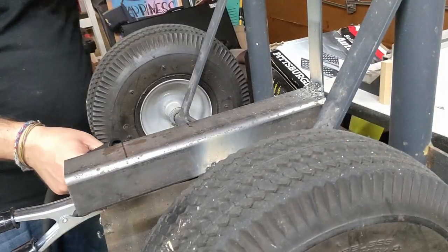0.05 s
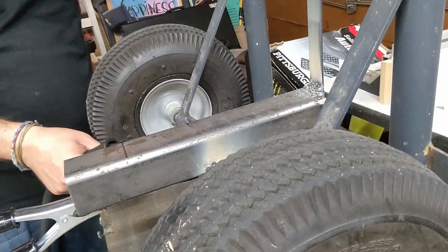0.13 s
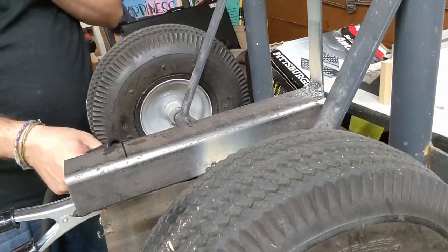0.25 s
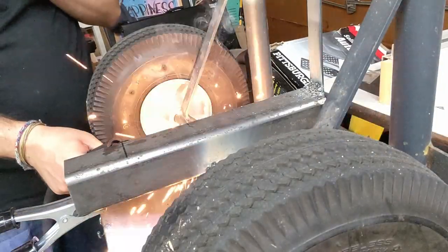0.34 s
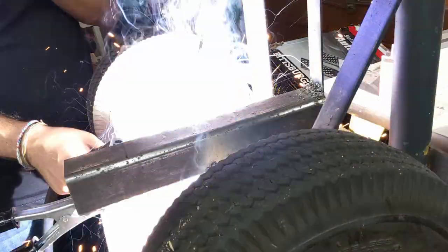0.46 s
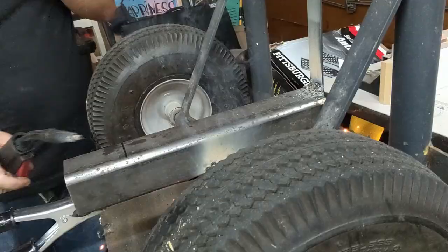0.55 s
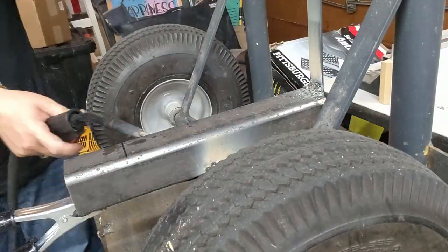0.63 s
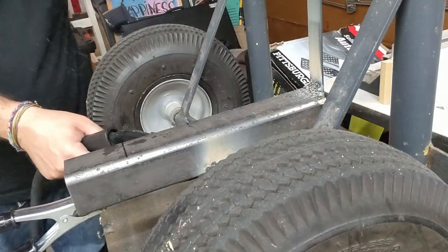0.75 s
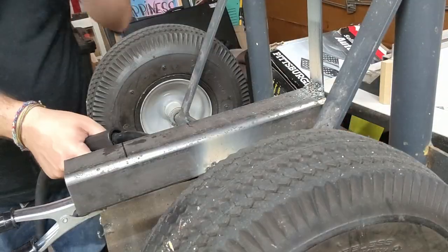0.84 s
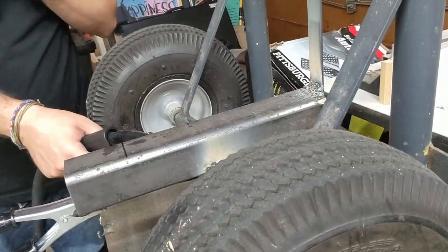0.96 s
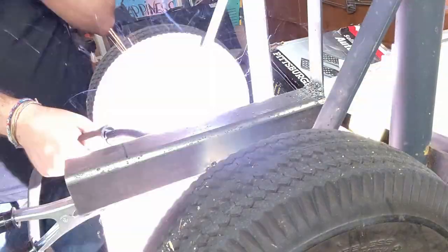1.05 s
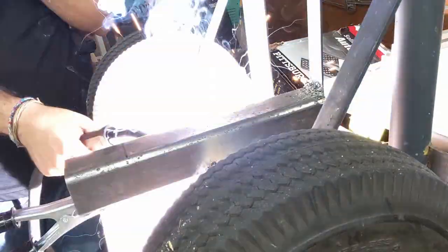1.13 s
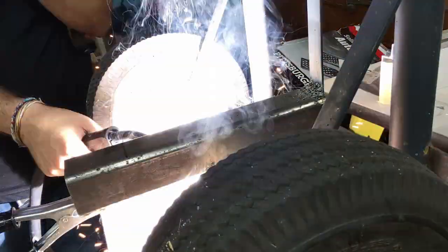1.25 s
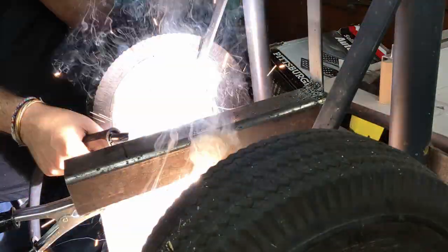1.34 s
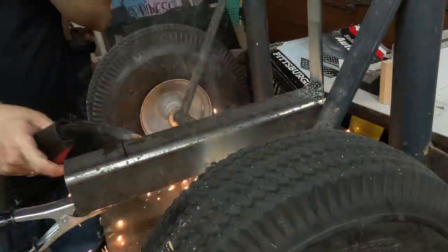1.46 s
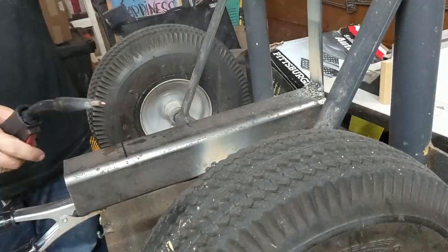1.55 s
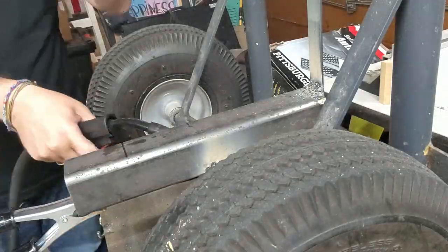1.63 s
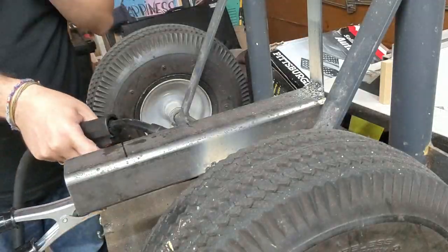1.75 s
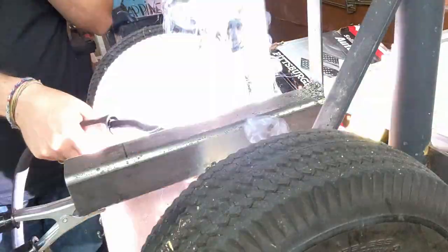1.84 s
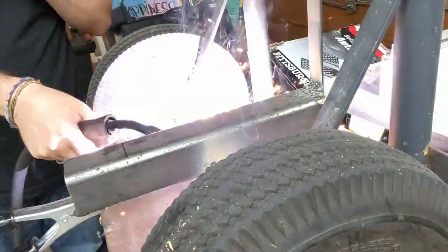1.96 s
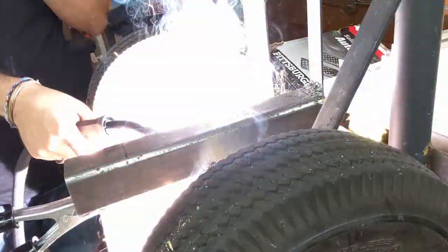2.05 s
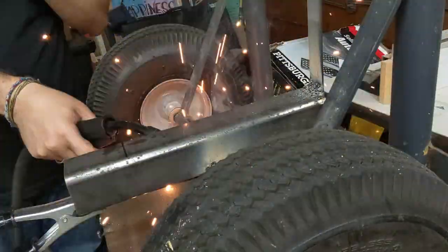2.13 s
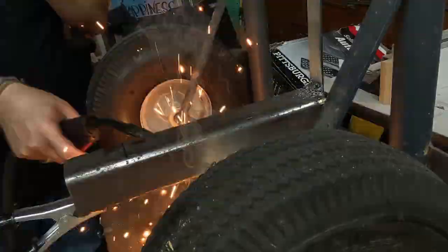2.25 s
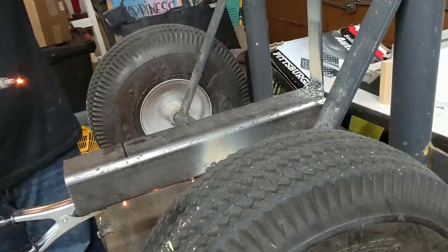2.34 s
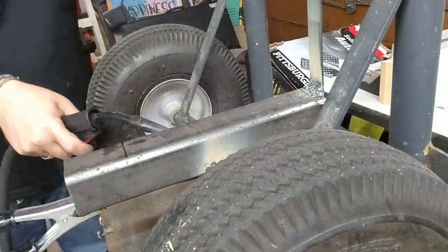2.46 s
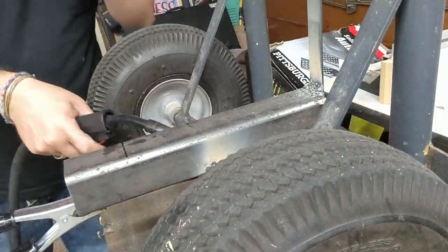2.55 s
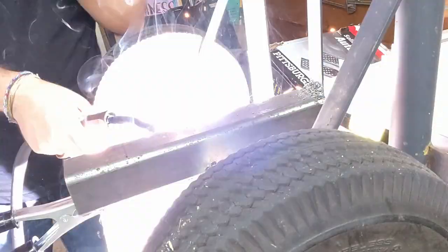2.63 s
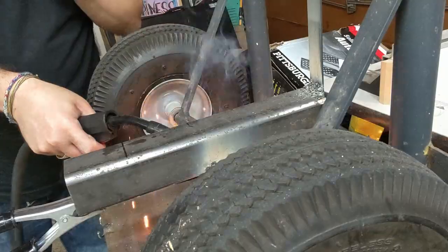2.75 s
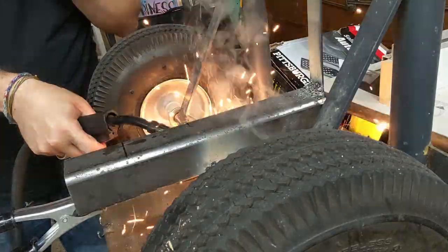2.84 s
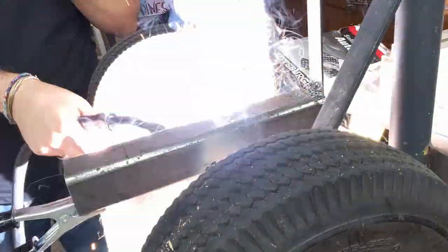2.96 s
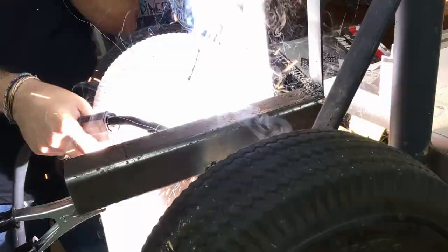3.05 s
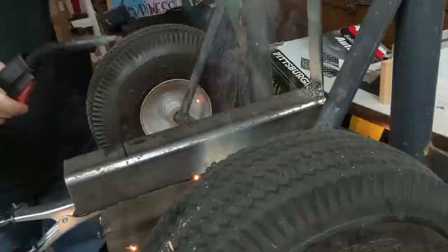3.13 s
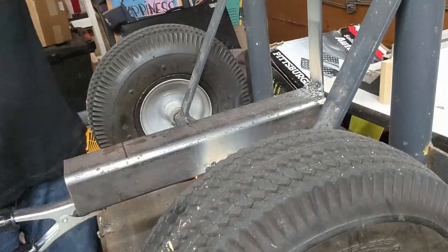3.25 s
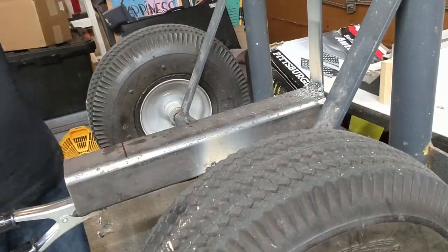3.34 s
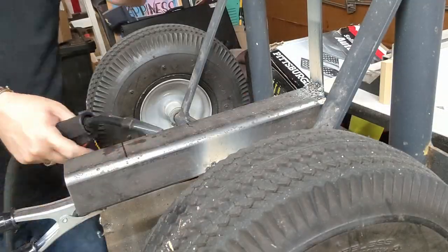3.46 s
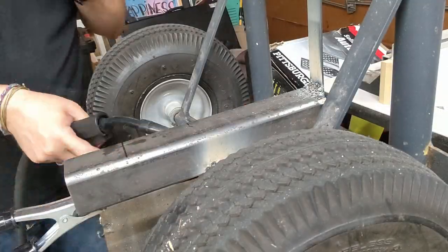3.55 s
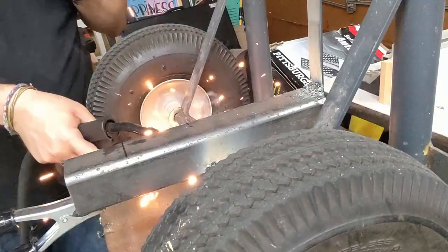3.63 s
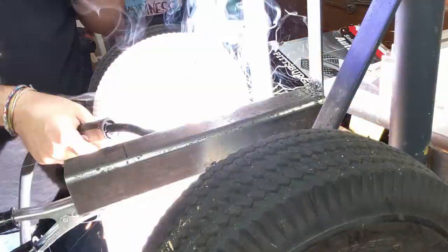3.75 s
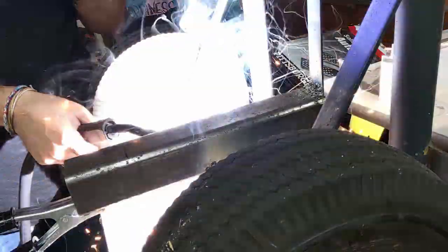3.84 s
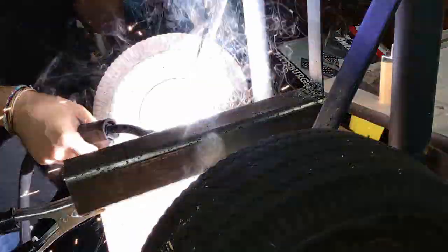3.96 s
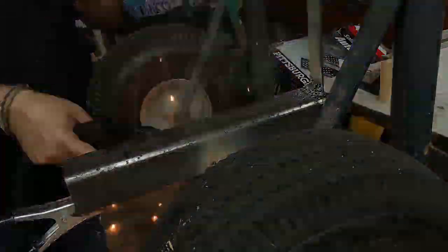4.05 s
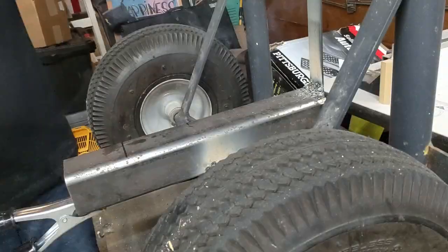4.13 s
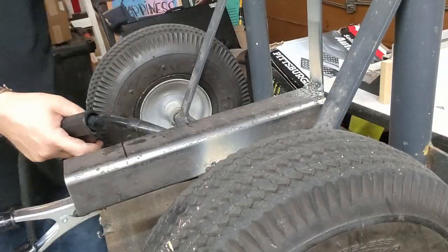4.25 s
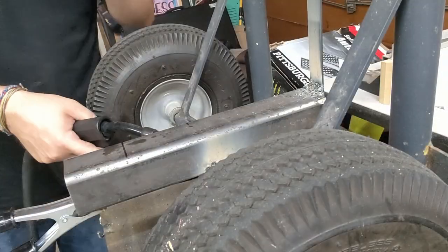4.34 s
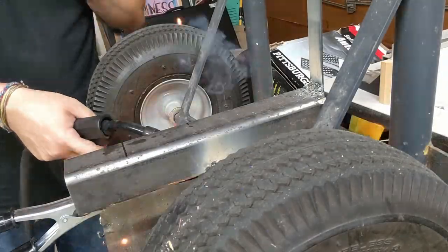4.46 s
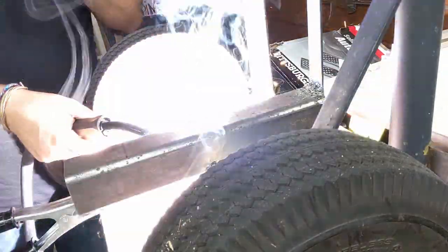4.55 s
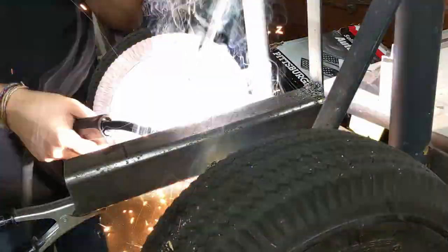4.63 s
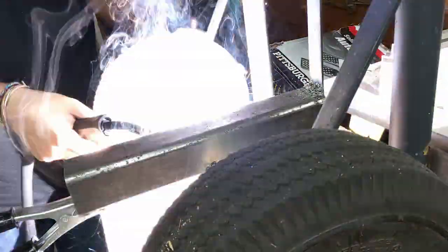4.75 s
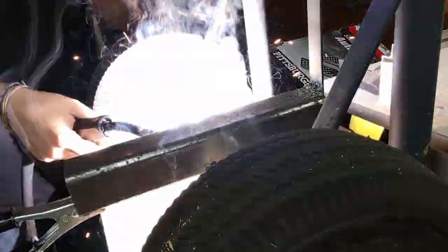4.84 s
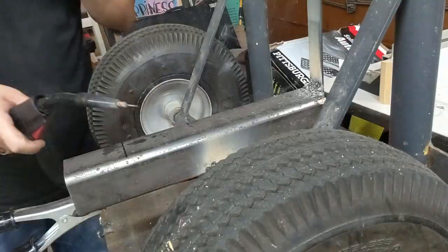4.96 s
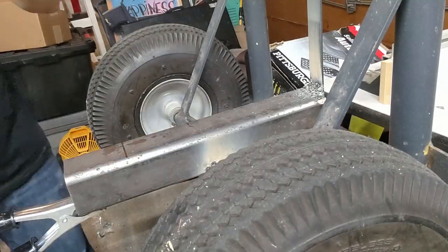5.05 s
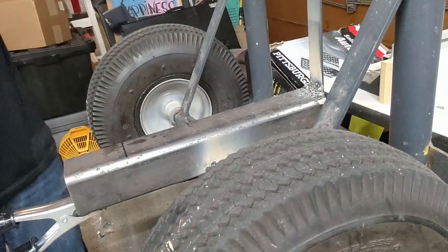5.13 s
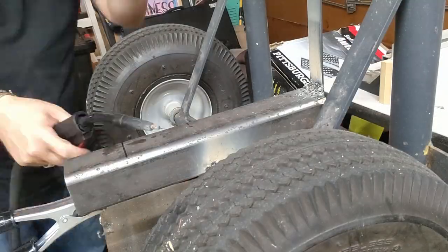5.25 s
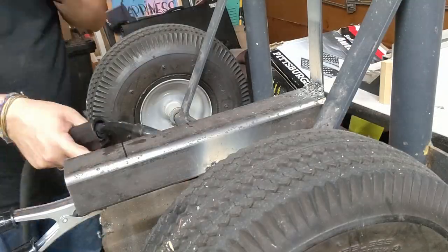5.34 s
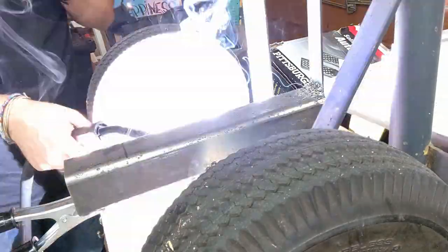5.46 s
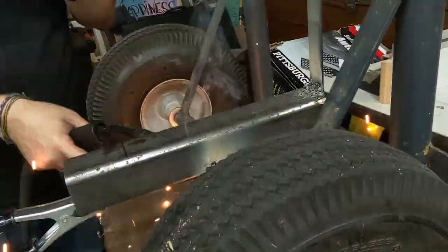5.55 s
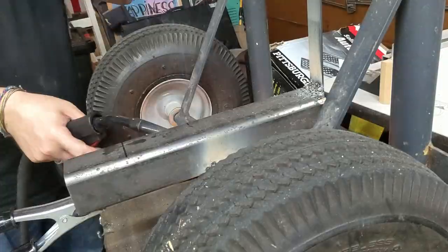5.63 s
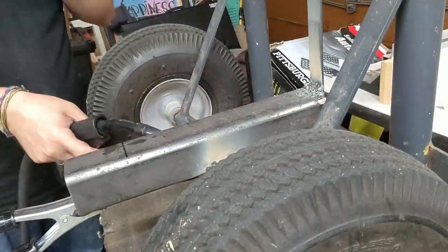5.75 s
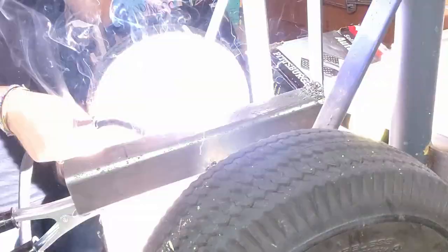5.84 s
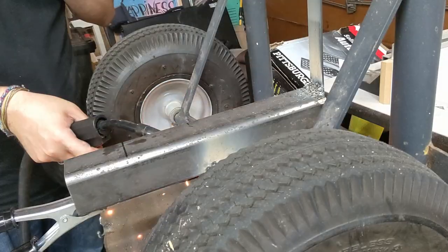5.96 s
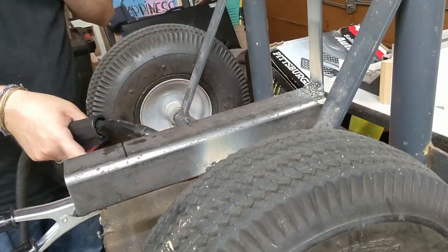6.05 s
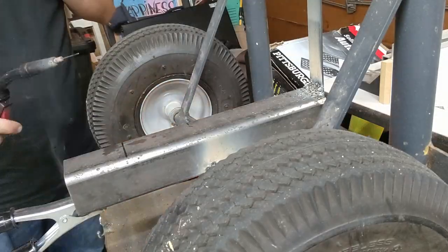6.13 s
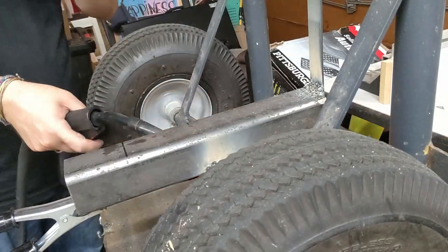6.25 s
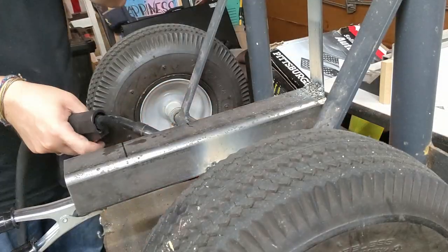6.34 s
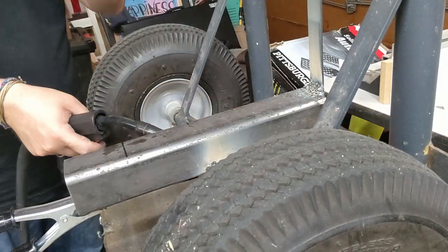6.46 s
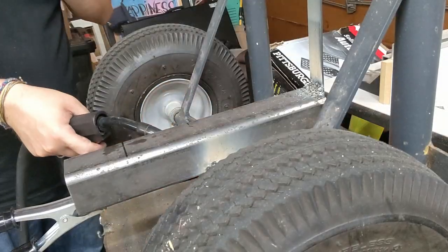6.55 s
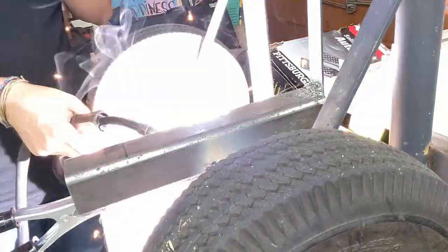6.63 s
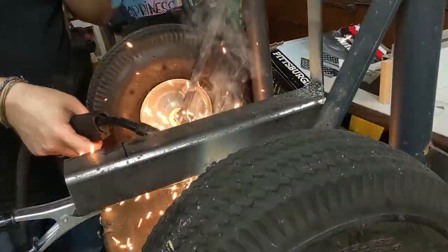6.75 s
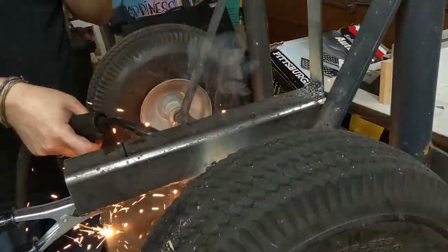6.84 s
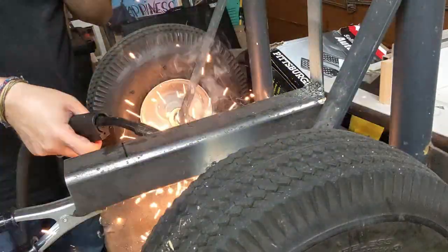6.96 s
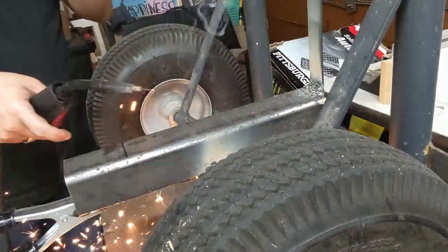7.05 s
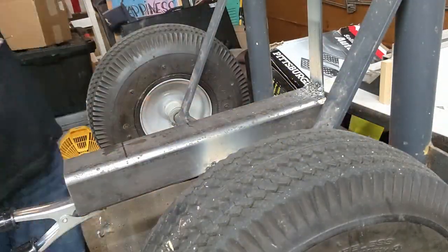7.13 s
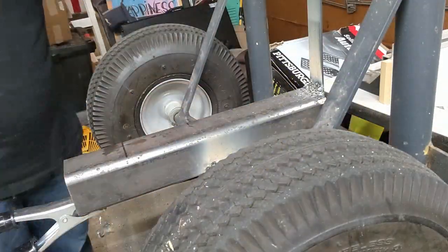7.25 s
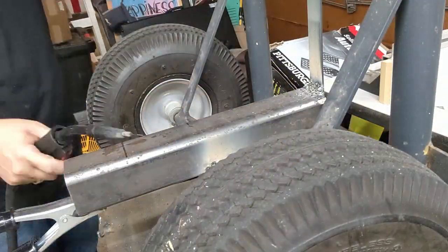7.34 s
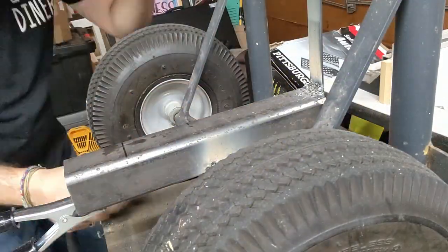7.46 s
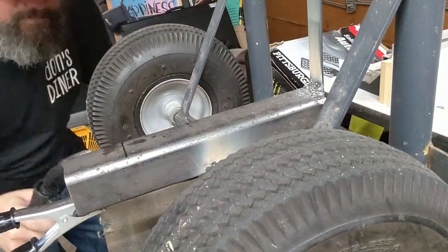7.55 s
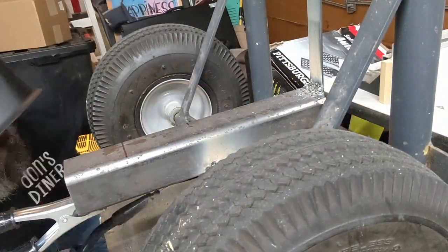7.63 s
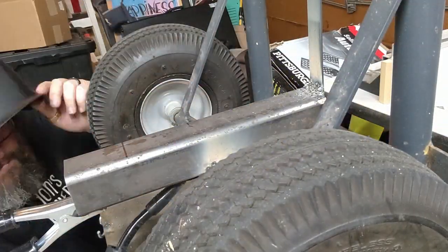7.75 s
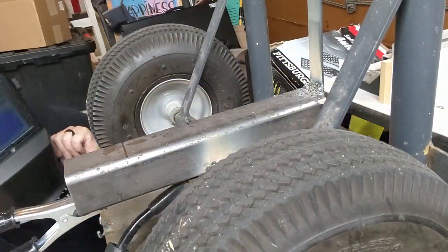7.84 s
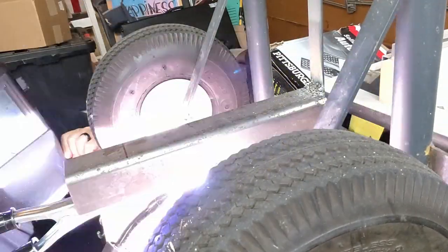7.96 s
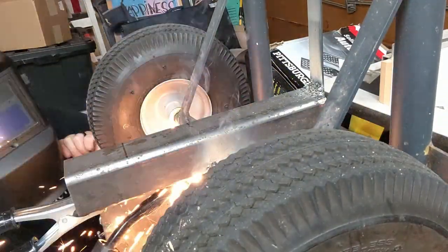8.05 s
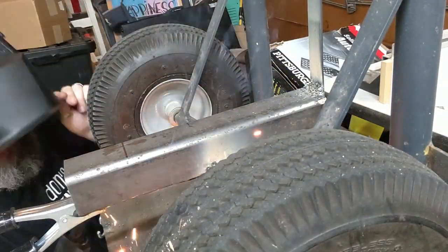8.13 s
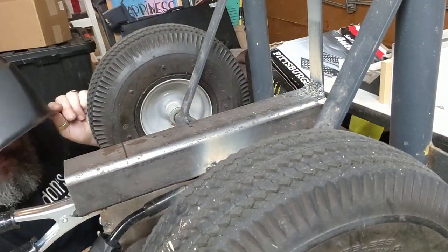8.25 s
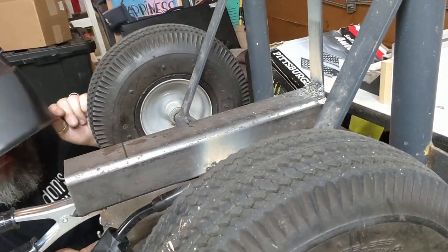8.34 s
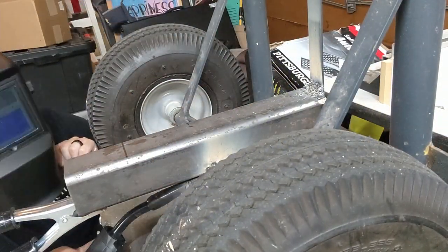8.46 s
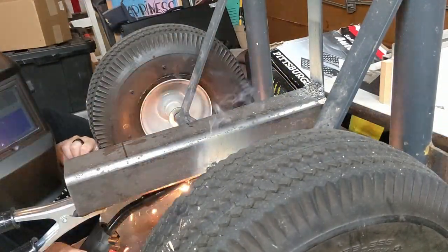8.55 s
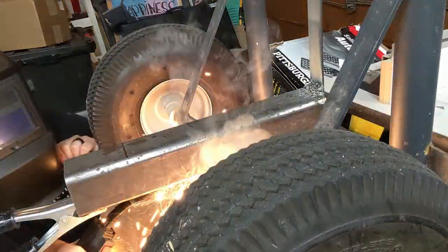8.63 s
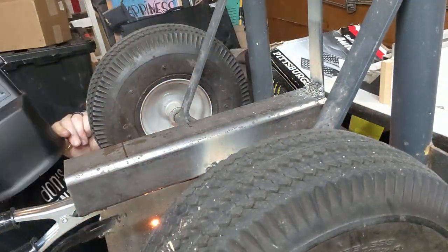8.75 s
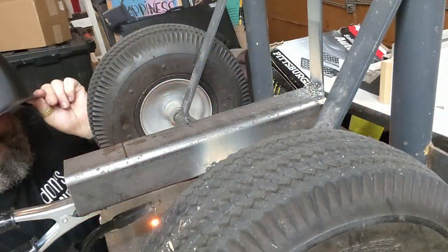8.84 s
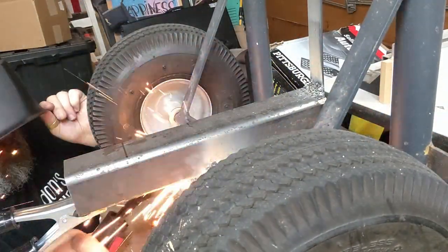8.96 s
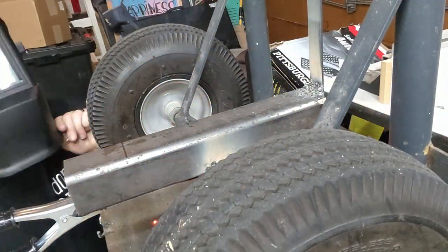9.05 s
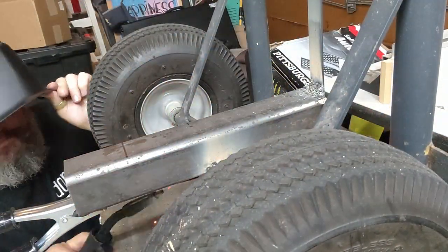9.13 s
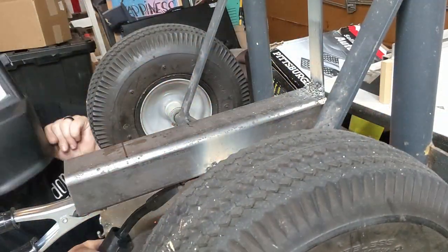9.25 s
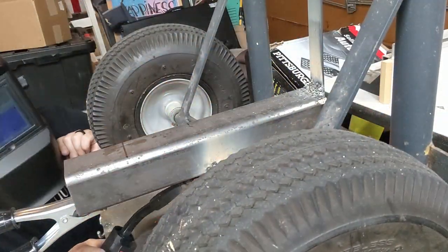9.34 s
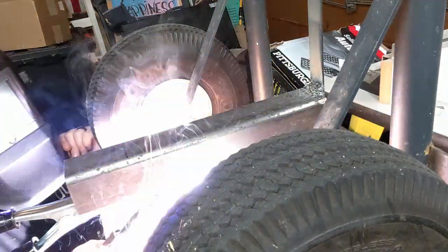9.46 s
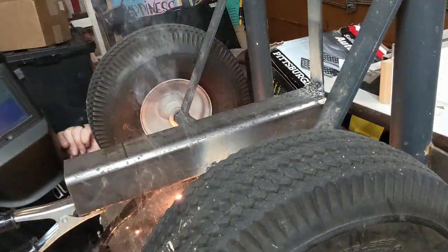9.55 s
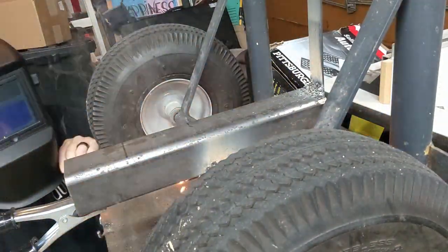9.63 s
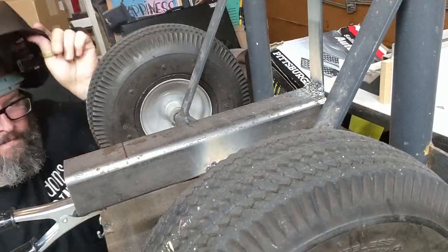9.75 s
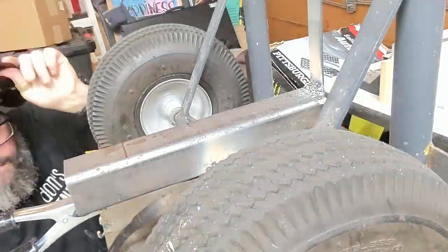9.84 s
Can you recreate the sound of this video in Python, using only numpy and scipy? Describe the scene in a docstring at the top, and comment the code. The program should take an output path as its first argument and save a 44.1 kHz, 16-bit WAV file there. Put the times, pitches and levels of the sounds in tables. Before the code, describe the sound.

Close, stop-start arc welding sizzles and pops on steel tubing, with a quiet machine fan running in the gaps.

```python
"""The arc of a wire-feed welder tacks square steel tubing, close by in a small cluttered workshop.
It burns in short flares of noise, modulated into a crackle by countless tiny short circuits; the shorted
wire blows apart with sharp pops and puffs of air. Resonances of the steel colour the arc and the ticks
of spatter and torch between tacks. One hollow knock sounds late in the job. Beneath it all lie the
machine's fan and whine and a low rumble that comes and goes."""
import sys
import numpy as np
from scipy import signal
from scipy.fft import rfft, irfft
from scipy.io import wavfile

SR = 44100
rng = np.random.default_rng(int(sys.argv[2]) if len(sys.argv) > 2 else 0)


def unload_wav(signal):
    """Save mono or channel-first audio to the path in sys.argv[1] as 16-bit WAV at rate SR, clipped to [-1, 1]."""
    wavfile.write(
        sys.argv[1],
        SR,
        np.round(np.clip(np.atleast_2d(signal).T, -1, 1) * 32767).astype(np.int16),
    )


N = 436590
TIME = np.arange(N) / SR
HZ = np.fft.rfftfreq(N, 1 / SR)

# Levels in the tables are relative; balance is left minus right.
# Flares of the arc: start t/s, end t/s, fizz level/dB, rasp level/dB
FLARES = [(0.336, 0.342, -23.5, -43), (0.381, 0.413, -31, -32), (0.429, 0.544, -25.5, -27),
          (1.083, 1.088, -31.5, -23), (1.114, 1.139, -28.5, -29), (1.152, 1.22, -24, -24.5),
          (1.237, 1.26, -27.5, -29), (1.276, 1.417, -28, -37.5), (1.43, 1.445, -22.5, -35.5),
          (1.462, 1.475, -26, -35), (1.493, 1.505, -20.5, -29.5), (1.825, 1.864, -22.5, -27),
          (1.902, 1.933, -23.5, -25.5), (2.015, 2.037, -24, -26), (2.059, 2.133, -23.5, -27),
          (2.169, 2.186, -20, -27), (2.216, 2.263, -24.5, -27), (2.272, 2.32, -28.5, -31),
          (2.677, 2.702, -31, -29.5), (2.782, 2.806, -38, -28.5), (2.829, 2.9, -26, -24.5),
          (2.916, 2.947, -23, -27.5), (2.961, 2.975, -22.5, -25), (3.009, 3.04, -28, -28.5),
          (3.05, 3.149, -25.5, -26.5), (3.692, 3.775, -25, -30.5), (3.784, 3.89, -26, -29),
          (3.903, 3.978, -23, -24.5), (3.976, 4.088, -24.5, -26), (4.482, 4.493, -25, -24),
          (4.532, 4.611, -25.5, -24.5), (4.62, 4.698, -30.5, -26.5), (4.758, 4.854, -25.5, -27),
          (4.856, 4.911, -25, -24.5), (5.448, 5.472, -35, -29), (5.522, 5.594, -30.5, -31.5),
          (5.891, 5.912, -29.5, -31), (6.664, 6.707, -26, -29), (6.725, 6.739, -33, -37),
          (6.749, 6.783, -34.5, -32.5), (6.783, 6.816, -27.5, -25.5), (6.862, 6.879, -23.5, -25),
          (6.944, 6.957, -31, -32), (6.993, 7.028, -34, -27), (7.033, 7.058, -27.5, -36),
          (8.002, 8.038, -30.5, -29), (8.06, 8.117, -38, -38), (8.533, 8.598, -34, -38),
          (8.618, 8.636, -31.5, -26.5), (8.653, 8.696, -27, -27.5), (9.013, 9.025, -33, -31.5),
          (9.417, 9.441, -30, -24.5), (9.464, 9.486, -26.5, -22), (9.505, 9.568, -28, -28.5)]
# Spectra of the arc's high, middle and low noise bands: f/Hz, level/dB
FIZZ = [(1800, -56), (2900, -6.5), (3500, -5.5), (5500, -2), (7000, -3.5), (9000, -2.5), (10000, 2),
        (11400, 2.5), (13000, -2), (15650, -4), (16000, -13)]
RASP = [(500, -19), (720, -11.5), (850, -15.5), (1100, -6.5), (1250, -9.5), (1450, -3.5), (1850, -3),
        (2050, -4.5), (2700, -8.5), (3100, -13), (4000, -19)]
FLUTTER = [(20, -26), (50, -23), (100, 2.5), (180, 1.5), (270, -1), (400, 0), (600, -6.5), (750, -11),
           (1100, -62)]
# Resonances and notches of tube and torch gap: f/Hz, width/Hz, left gain/dB, right gain/dB
STEEL_MODES = [(1080, 150, 6, 2), (1210, 100, -3, -5), (1340, 130, -2, 4), (1595, 60, 4, 4),
               (1820, 140, 4, 4), (2160, 110, 4, 2), (2440, 120, 8, 1), (2630, 220, 3, 1), (3030, 90, 3, 5),
               (4050, 200, -3, 0), (4490, 170, 3.5, 3), (4800, 480, 8, 4), (5400, 200, -4, 0),
               (6130, 100, 3, 1), (6450, 180, 3, 0), (7900, 80, 2, 3), (9170, 100, 5, 2),
               (10900, 300, 3, 0), (12230, 130, 3, 1), (12520, 170, 11, 1), (13220, 190, -2, 5),
               (13680, 170, 6, 0), (13950, 140, 3, 10), (14400, 150, 6, 0), (14690, 190, 2, 6)]
# Shading by the tube once the torch is under it: f/Hz, gain/dB
TUBE_SHADE = [(200, 5.5), (700, 3), (1400, 2.5), (2000, 0.5), (2600, -2), (3700, 4.5), (4700, -4.5),
              (6500, 1), (10000, -1.5), (14000, -2)]
# Level difference of the arc between channels: f/Hz, balance/dB
ARC_BALANCE = [(50, 9.5), (150, 1), (400, 2), (1000, 2), (1500, -3), (2200, 3), (5500, 1), (6600, 4),
               (8800, 4.5), (10000, 3), (11500, -4.5), (15000, -2.5)]
# Coherence of the arc between channels: f/Hz, coefficient
ARC_COHERENCE = [(60, .1), (130, .5), (220, .9), (600, .88), (1250, .3), (1700, .74), (2400, .7),
                 (3200, .35), (4700, .72), (5600, .4), (9000, .25), (11000, .5), (15000, .35)]
# Phase lead of the arc in the left channel: f/Hz, phase/rad
ARC_PHASE = [(100, 0), (600, .1), (2000, -.4), (4700, -.1), (5400, -1.2), (7000, -1.8), (11000, -3.7),
             (12500, -5.2), (14200, -8)]
# Loudest bursts of the shorted wire: t/s, level/dB, balance/dB
POPS = [(.339, -14, 7), (.43, -19, 10), (.5435, -16.5, 9), (1.0915, -11.5, 1), (1.2, -12, 7),
        (1.2455, -12.5, 0), (1.83, -14.5, -1), (1.922, -19, 8), (2.018, -13.5, 6), (2.078, -10, 0),
        (2.171, -24, -3.5), (2.2195, -17.5, 11), (2.2575, -18, 1), (2.2795, -10.5, 8), (2.6915, -14.5, -4),
        (2.791, -8.5, 1), (2.9275, -18, -3), (2.976, -13.5, -6), (3.0305, -11.5, -5), (3.102, -12, -9),
        (3.117, -17, -5), (3.1505, -13.5, -3), (3.745, -12.5, 5), (3.804, -14.5, 7), (3.861, -15, 7),
        (3.8825, -15, 6), (3.9075, -16.5, 7), (4.0625, -12.5, 3), (4.555, -32, -12), (4.657, -8.5, -1),
        (4.7775, -18, 13), (4.8705, -14, 7), (5.4535, -17, 6), (5.532, -12.5, 10), (5.543, -19, -7),
        (5.9105, -17, 2), (6.675, -22, -8), (6.78, -17.5, 0), (6.878, -21, 8), (6.9465, -21, 4),
        (7.018, -15.5, -5), (8.027, -10, 4), (8.069, -9.5, 0.5), (9.022, -14, -4.5), (9.426, -21, -5),
        (9.465, -16, -3), (9.525, -15, 3)]
# Impacts of spatter and torch on the steel: t/s, level/dB
TICKS = [(.806, -54), (3.364, -34.5), (3.451, -52), (3.562, -51), (4.219, -56), (5.04, -41), (5.125, -50.5),
         (5.197, -47), (5.327, -40.5), (7.099, -42), (7.165, -55), (7.274, -53), (7.358, -47.5),
         (7.604, -49), (7.631, -35.5), (7.782, -50), (7.88, -52.5), (8.422, -50)]
# Puffs of air and soft bumps: t/s, level/dB, f/Hz
PUFFS = [(.5, -20.5, 121), (1.265, -18.5, 114), (2.239, -21, 121), (2.918, -24, 97), (3.798, -21.5, 114),
         (3.959, -15.5, 142), (4.019, -11, 123), (4.829, -16.5, 107), (5.555, -12.5, 119),
         (7.72, -32.5, 161), (8.018, -23.5, 169), (8.576, -20, 111), (8.63, -19, 140), (9.026, -15.5, 110),
         (9.429, -22, 136)]
# Spectrum of the fan: f/Hz, level/dB
FAN_SPECTRUM = [(18, -39), (30, -6), (86, -16.5), (118, -12.5), (252, -5), (280, -24.5), (311, -4),
                (600, -7), (1500, -14), (1630, -7), (2060, -18.5), (2290, -13), (2980, -18.5), (5040, -24),
                (16000, -37.5)]
# Coherence of the fan between channels: f/Hz, coefficient
FAN_COHERENCE = [(60, 1), (150, 0.73), (380, 1), (950, 0.12), (2380, -0.3), (5980, -0.021), (15000, 0.13)]
# Resonances of the machine's case: f/Hz, width/Hz, left gain/dB, right gain/dB
CASE_MODES = [(394, 110, 4, 3), (1002, 56, 8.5, 5.5), (1775, 73, 7.5, 4)]
# Hum and whine of the machine: f/Hz, level/dB
WHINE_PARTIALS = [(117, -62.5), (281, -57.5), (371.4, -62), (587, -62.5), (802, -69), (1082, -67),
                  (1599, -72.5), (1669, -55), (1884, -70), (2250, -64.5), (2751, -73.5)]
# Spectrum of the rumble: f/Hz, level/dB
RUMBLE_SPECTRUM = [(30, -37), (60, -7), (100, -3.5), (150, -4.5), (260, -11.5), (900, -61)]
# Envelope of the rumble: t/s, level/dB
RUMBLE_LEVELS = [(.25, -79), (.6, -56.5), (1.05, -49.5), (1.3, -56), (1.8, -56), (2.5, -72), (5.1, -57),
                 (7.3, -78), (8.3, -64.5)]
# Brief dips of the background: t/s, depth/dB
BACKGROUND_DIPS = [(1.52, 7.5), (8.13, 8.5), (9.041, 15)]

ARC_PAN_DB = -0.1


def arc():
    """Amplitude modulation: burn, pops, ticks and sparks are envelopes on the same steel-coloured noise."""
    fizz, rasp, flutter = arc_bands()
    fizz_level, rasp_level = flare_envelopes()
    grain = crackle(per_s=480, spread_db=5.5, life_s=.001, steady=.86)
    # the lower the band, the less it follows the single shorts
    burn = gain_of(-1.5) * fizz * fizz_level * grain
    burn += gain_of(-3.5) * rasp * rasp_level * unit_rms(grain ** .74)
    burn += gain_of(-7.5) * flutter * rasp_level * unit_rms(grain ** .64)
    pop_rows = [*POPS, *sputter(fizz_level)]
    pops = bursts(pop_rows, swell_s=.00075, decay_s=.0012, echo_db=-10, echo_s=.0066)
    cracks = gain_of(-7.5) * pops * (fizz + gain_of(-8) * rasp + gain_of(-13) * flutter)
    tick_rows = [(s, db, 0) for s, db in TICKS]
    ticks = bursts(tick_rows, swell_s=.0043, decay_s=.006, echo_db=-17, echo_s=.025)
    landings = bursts(sparks(), swell_s=.0012, decay_s=.002, echo_db=0, echo_s=.019)
    impacts = gain_of(1) * ticks * (fizz + gain_of(-6) * rasp) + landings * fizz
    burn += droplets(gain_of(-11) * fizz_level, per_s=270, spread_db=2)
    return burn * pan(ARC_PAN_DB) + cracks + impacts


def arc_bands(under_tube_s=6.9):
    """Source and filter: the steel colours three noise bands, and shades them once the torch is under it."""
    body = resonances(STEEL_MODES) * pan(curve(ARC_BALANCE)) * clutter()
    for spectrum in (FIZZ, RASP, FLUTTER):
        above = noise(body * gain_of(curve(spectrum)), curve(ARC_COHERENCE), curve(ARC_PHASE))
        under = unit_rms(irfft(rfft(above) * gain_of(curve(TUBE_SHADE)), N))
        yield np.where(TIME < under_tube_s, above, under)


def flare_envelopes(cold_after_s=.075, lead_s=.0036, fall_db_per_s=993, tail_db=-49, tail_t60_s=.49):
    """Exponential growth and decay: fizz and rasp swell, waver and leave a faint reverberant tail."""
    levels, last_end = np.zeros((2, N)), 0
    for start, end, fizz_db, rasp_db in FLARES:
        part, t = around(start, .04, .6)
        tenfold_s = .0083 if start - last_end > cold_after_s else .012  # cold strike or relight
        rise = gain_of(-20 * np.maximum(lead_s - t, 0) / tenfold_s)
        dying_s = np.maximum(t - (end - start) + lead_s, 0)
        fall = gain_of(-fall_db_per_s * dying_s) + gain_of(tail_db - 60 * dying_s / tail_t60_s)
        levels[:, part] = np.maximum(levels[:, part], gain_of([[fizz_db], [rasp_db]]) * rise * fall)
        last_end = end
    return levels * gain_of(1.56 * drift(per_s=66))


def crackle(per_s, spread_db, life_s, steady):
    """Shot noise: tiny random shorts each add a surge of power to the steady burn."""
    onsets = rng.random(N) < per_s / SR
    sizes = gain_of(spread_db * np.minimum(rng.exponential(1, N), 3))
    t = TIME[:1024]
    surge = signal.oaconvolve(onsets * sizes ** 2, t * np.exp(-t / life_s))[:N]
    return unit_rms(np.sqrt(abs(surge / surge.mean()) + steady))


def bursts(rows, swell_s, decay_s, echo_db, echo_s):
    """Incoherent addition: sharp bursts and their scatter off nearby steel sum in power to one envelope."""
    power = np.zeros((2, N))
    for s, db, balance_db in rows:
        part, t = around(s, .02, .12)
        age = np.maximum(t, 0)
        rise = np.exp(np.minimum(t, 0) / swell_s)
        fall = np.exp(-age / decay_s) + gain_of(echo_db) * np.exp(-age / echo_s)
        power[:, part] += (gain_of(db) * pan(balance_db) * rise * fall) ** 2
    return np.sqrt(power)


def sputter(level, per_s=7.5, boost_db=5.5):
    """A Poisson process of lesser pops, in proportion to the arc's strength; rows as in POPS."""
    at = np.flatnonzero(rng.random(N) < per_s / SR)
    balance_db = ARC_PAN_DB + 3 * rng.standard_normal(N)
    return zip(TIME[at], 20 * np.log10(level[at] + 1e-9) + boost_db, balance_db[at])


def droplets(level, per_s, spread_db):
    """Impulse response: each bursting droplet is a hard click that rings through the steel."""
    sizes = gain_of(spread_db * np.minimum(rng.exponential(1, N), 2.5)) * rng.choice([-1, 1], N)
    clicks = unit_rms(sizes * (rng.random(N) < per_s / SR))
    spectrum = gain_of(curve(FIZZ)) + gain_of(curve(RASP))
    colour = resonances(STEEL_MODES) * pan(curve(ARC_BALANCE)) * spectrum
    log_gain = np.log(np.maximum(unit_rms(colour), 1e-4))
    mirrored = np.concatenate([log_gain, log_gain[:, -2:0:-1]], 1)
    # minimum phase, so that the ring follows the click
    response = np.exp(np.conj(signal.hilbert(mirrored)))[:, :len(HZ)]
    response[1] *= np.exp(-1j * curve(ARC_PHASE))
    return irfft(rfft(level * clicks) * response, N)


def sparks(per_flare=2, flight_s=.14, db=-58, scatter_db=3):
    """Time of flight: sparks land faintly at random delays after each flare; rows as in POPS."""
    ends = np.repeat([end for _, end, _, _ in FLARES], per_flare)
    flight, size, side = rng.standard_normal((len(ends), 3)).T
    return zip(ends + flight_s * abs(flight), db + scatter_db * size, scatter_db * side)


def clutter(strength=.58, longest_s=.008, count=40):
    """Comb filtering: early echoes from frame and bench ripple the spectrum, differently on each side."""
    taps = np.zeros((2, N))
    delays = (rng.uniform(.1, 1, (2, count)) * longest_s * SR).astype(int)
    np.put_along_axis(taps, delays, rng.choice([-1, 1], delays.shape) * strength / np.sqrt(count), 1)
    return abs(1 + rfft(taps) * np.minimum(HZ / 3000, 1))  # long waves pass the clutter by


def puffs(swell_s=.004, decay_s=.0048, push_hz=58):
    """Pressure pulses: each puff of air is a lopsided cycle or two over a slower, deeper push."""
    out = np.zeros((2, N))
    for (s, db, hz), turn in zip(PUFFS, rng.random(len(PUFFS))):
        part, t = around(s, .03, .08)
        envelope = np.exp(1 - np.hypot(1, t / np.where(t < 0, swell_s, decay_s)))
        lag = np.array([[0], [2 / (1 + (hz / 165) ** 10)]])  # slow puffs lag on the right
        angle = 2 * np.pi * (hz * t + turn)
        push = gain_of(-8) * np.sin(2 * np.pi * push_hz * t - lag)
        octave = gain_of(-15.5) * np.cos(2 * angle)
        out[:, part] += gain_of([[db], [db - 6]]) * envelope * (np.cos(angle - lag) + push + octave)
    return out


def knock(at_s=8.109, hz=1000, db=-27, t60_s=.017, balance_db=9):
    """A damped oscillation: one short hollow knock just after a tack."""
    out = np.zeros(N)
    part, t = around(at_s, 0, .1)
    out[part] = gain_of(db - 60 * t / t60_s) * np.sin(2 * np.pi * hz * t)
    return out * pan(balance_db)


def fan(db=-48.2, low_cut_hz=33):
    """Resonant filtering: broadband fan noise, without deep bass, sounds through the machine's case."""
    low_cut = 1 - 1 / (1 + (HZ / low_cut_hz) ** 4)
    colour = gain_of(curve(FAN_SPECTRUM)) * resonances(CASE_MODES) * low_cut
    return noise(colour, curve(FAN_COHERENCE)) * gain_of(db + .5 * drift(per_s=22))


def whine():
    """A line spectrum: the motor's partials waver together in pitch and separately in level."""
    motor_time = np.cumsum(1 + .0008 * drift(per_s=7)) / SR
    out = np.zeros((2, N))
    for hz, db in WHINE_PARTIALS:
        phase = rng.uniform(0, 2 * np.pi) + .45 * rng.standard_normal((2, 1))
        out += gain_of(db + 1.5 * drift(per_s=5)) * np.sin(2 * np.pi * hz * motor_time + phase)
    return out


def rumble():
    """Slow modulation: low noise, nearly coherent between the channels, comes and goes."""
    envelope = gain_of(np.interp(TIME, *np.transpose(RUMBLE_LEVELS)))
    return noise(gain_of(curve(RUMBLE_SPECTRUM)), coherence=.98) * envelope * pan(1.5)


def background_dips(recover_db_per_s=47.5):
    """Exponential recovery: the background's gain drops briefly and returns at a steady rate in dB."""
    dip_db = sum(np.interp(TIME, [s - .02, s, s + depth / recover_db_per_s], [0, depth, 0])
                 for s, depth in BACKGROUND_DIPS)
    return gain_of(-dip_db)


def noise(gain, coherence, phase=0):
    """Partial coherence: two channels of coloured noise share a common part."""
    left, independent = rfft(rng.standard_normal((2, N)))
    right = (coherence * left + np.sqrt(1 - coherence ** 2) * independent) * np.exp(-1j * phase)
    return unit_rms(irfft(np.array([left, right]) * gain, N))


def resonances(modes):
    """Lorentzian peaks and notches, summed in dB, give a gain for each channel."""
    return gain_of(sum(np.array([[left], [right]]) / (1 + (2 * (HZ - hz) / width) ** 2)
                       for hz, width, left, right in modes))


def drift(per_s):
    """Linear interpolation of random values gives a slow fluctuation of unit rms."""
    knots = rng.standard_normal(8192)
    return unit_rms(np.interp(TIME * per_s, np.arange(len(knots)), knots))


def curve(points):
    """Interpolation of (f/Hz, value) points on a logarithmic frequency axis."""
    hz, value = np.transpose(points)
    return np.interp(np.log(HZ + 1), np.log(np.sort(hz) + 1), value)


def around(s, before_s, after_s):
    """A time window: the samples near a moment, and their times counted from it."""
    part = slice(max(int((s - before_s) * SR), 0), int((s + after_s) * SR))
    return part, TIME[part] - s


def pan(balance_db):
    """A level difference, split evenly into left and right gains."""
    return gain_of(np.array([[.5], [-.5]]) * balance_db)


def gain_of(db):
    """The amplitude ratio of a level in decibels."""
    return 10 ** (np.asarray(db) / 20)


def unit_rms(x):
    """Normalisation to an rms of one."""
    return x / np.sqrt(np.mean(x ** 2) + 1e-20)


def scene():
    """Superposition: the welding adds to the workshop's background."""
    return arc() + puffs() + knock() + (fan() + whine() + rumble()) * background_dips()


def record(dry, cutoff_hz=15900):
    """Band limiting: a linear-phase low-pass filter removes the highest treble."""
    low_pass = signal.firwin(511, cutoff_hz, window=("kaiser", 9), fs=SR)
    return signal.oaconvolve(dry, low_pass[None], "same")


dry = scene()
out = record(dry)
unload_wav(out)
```